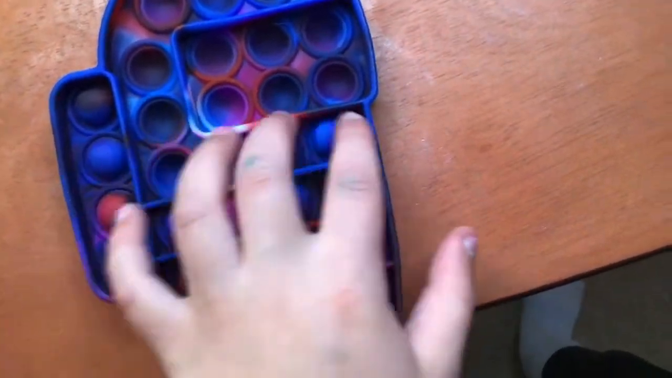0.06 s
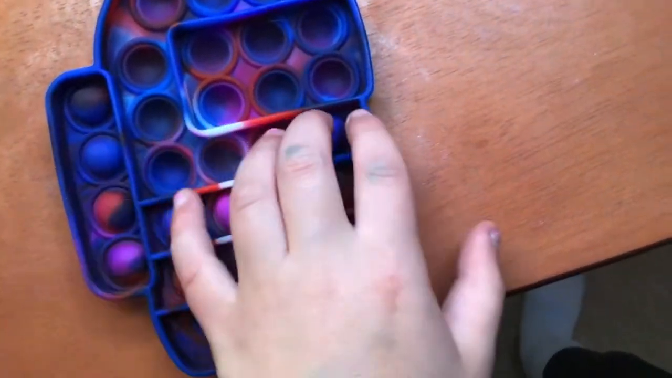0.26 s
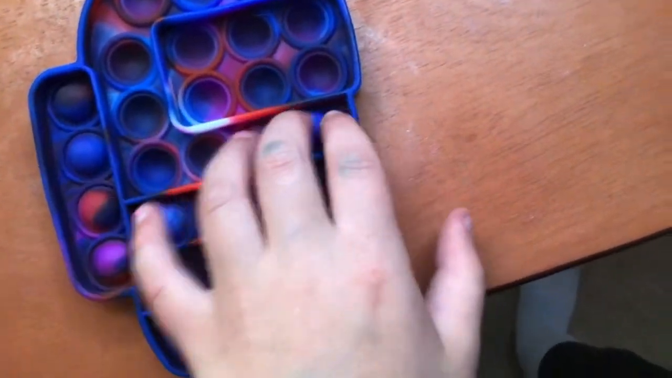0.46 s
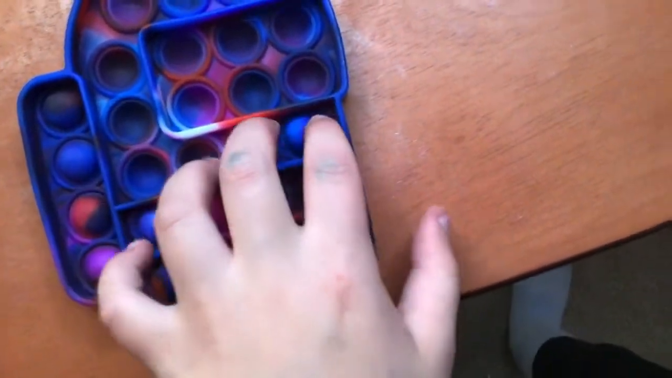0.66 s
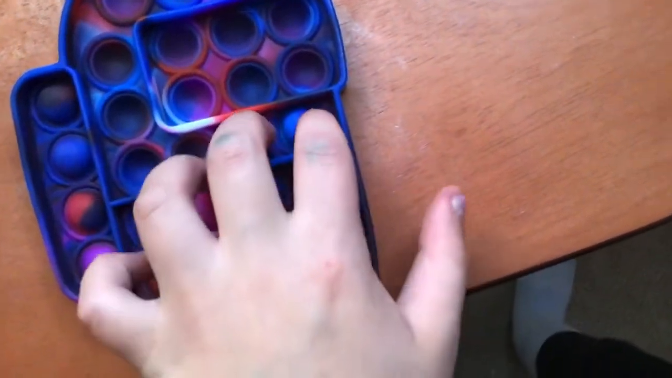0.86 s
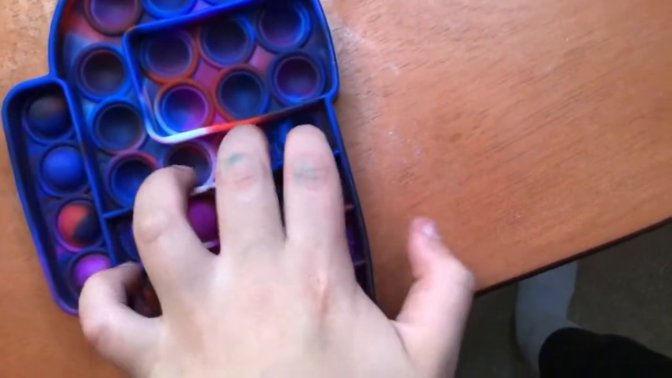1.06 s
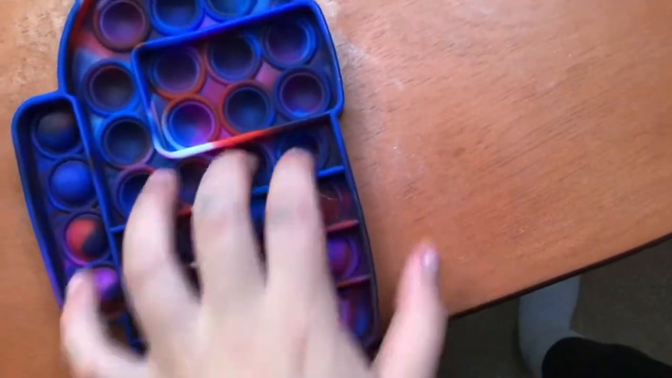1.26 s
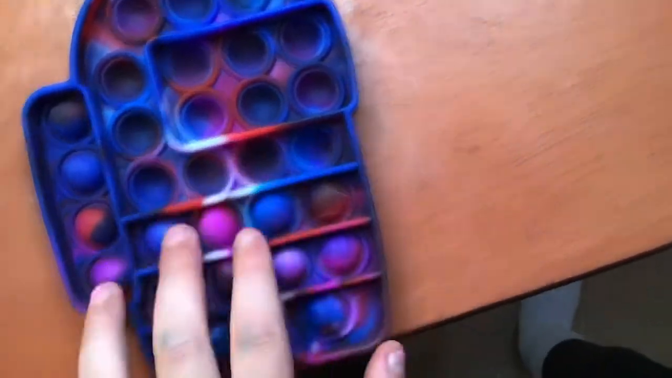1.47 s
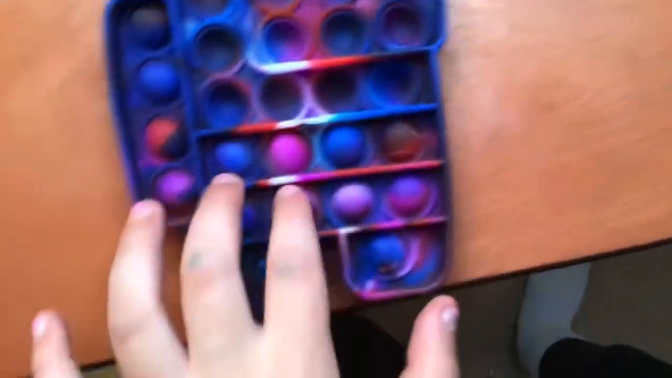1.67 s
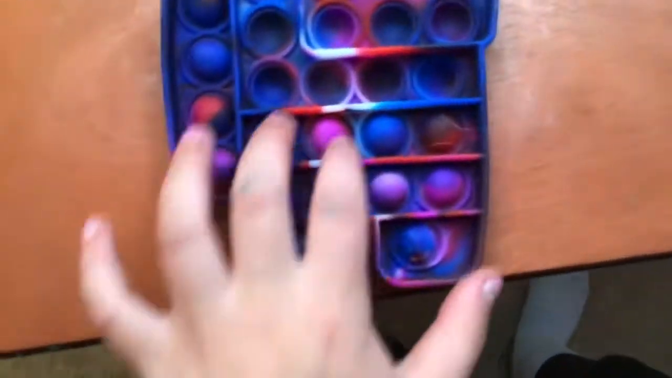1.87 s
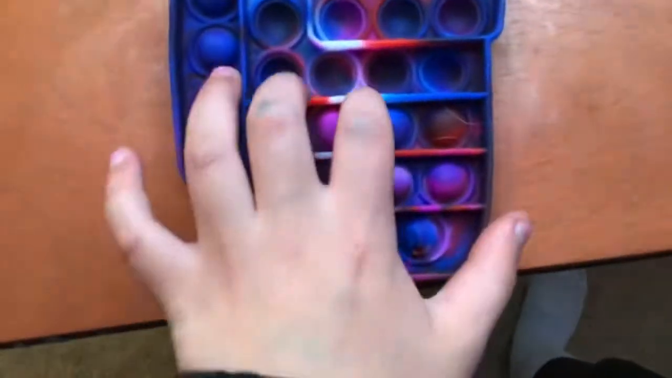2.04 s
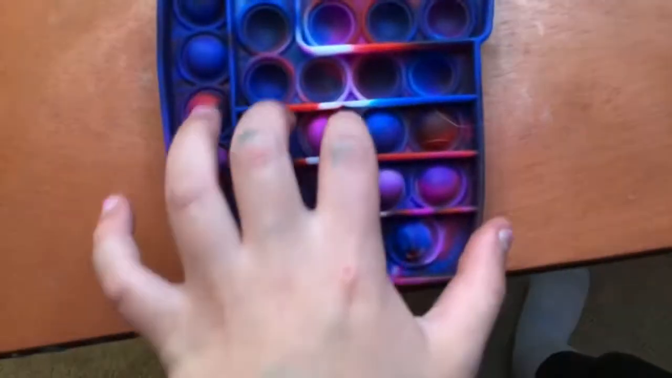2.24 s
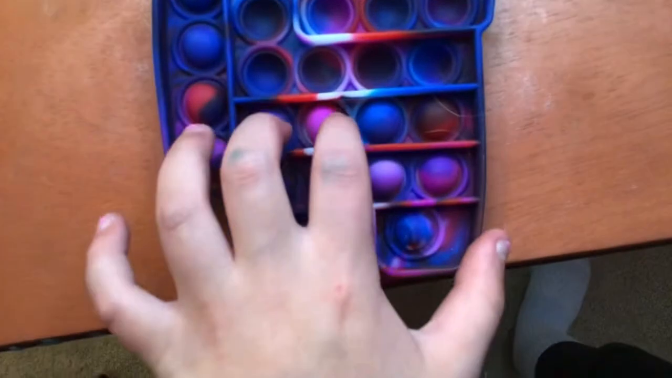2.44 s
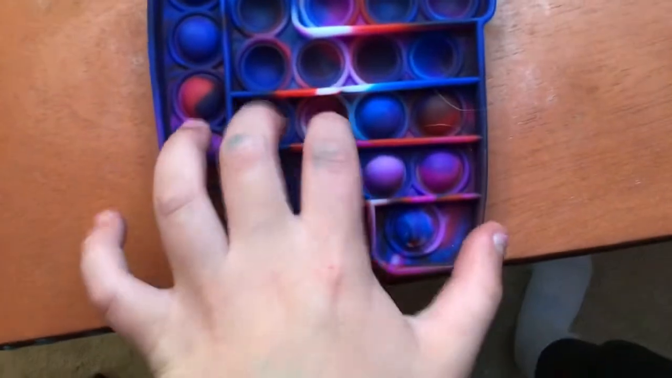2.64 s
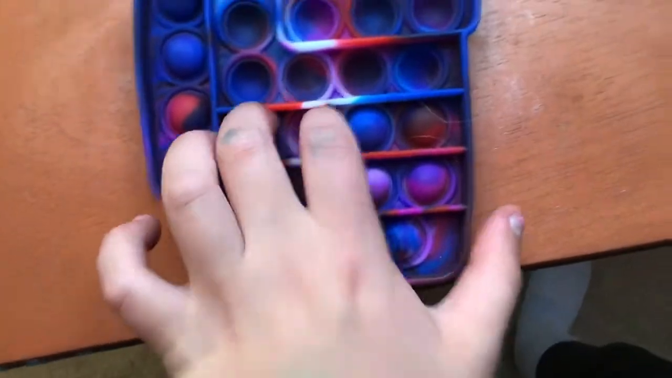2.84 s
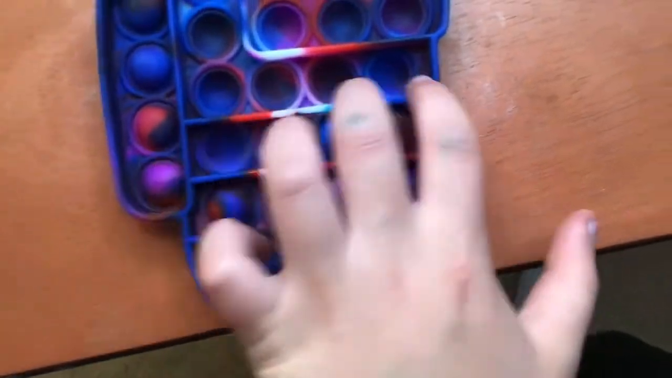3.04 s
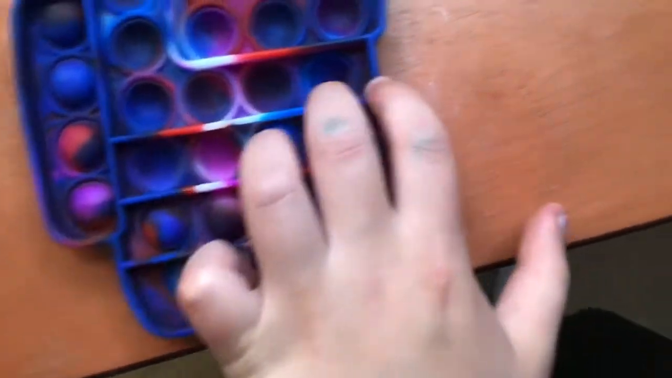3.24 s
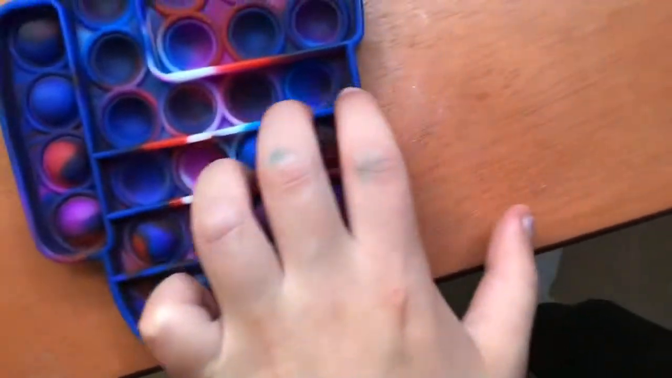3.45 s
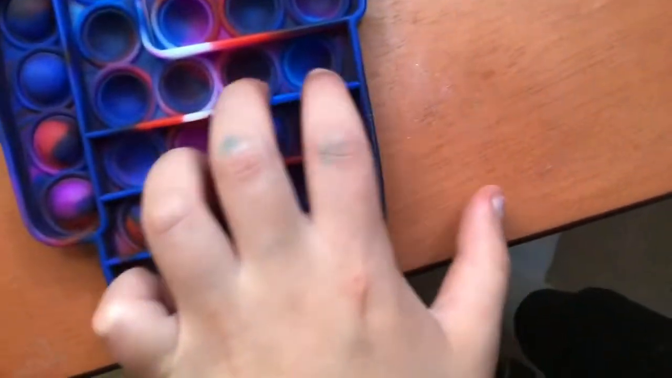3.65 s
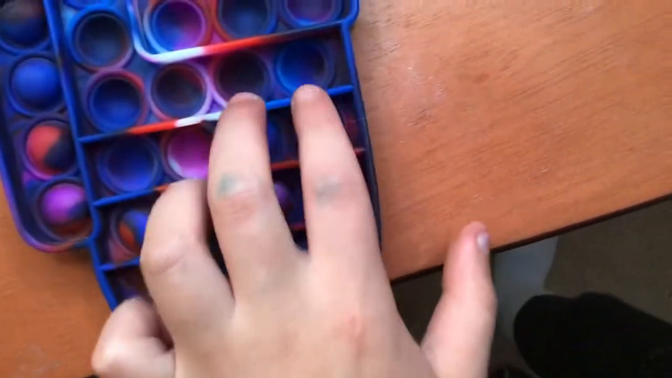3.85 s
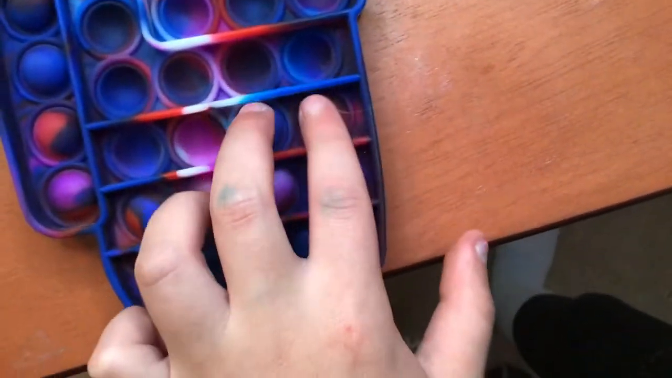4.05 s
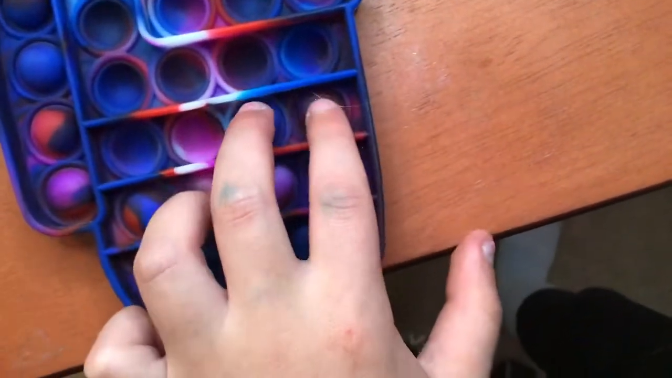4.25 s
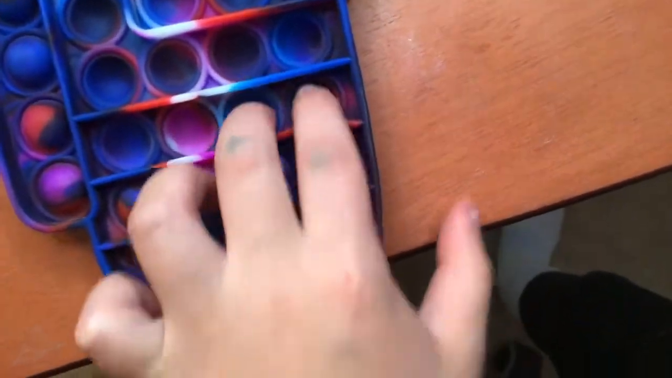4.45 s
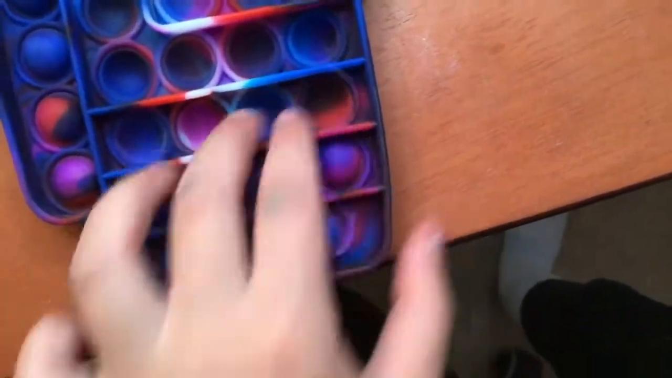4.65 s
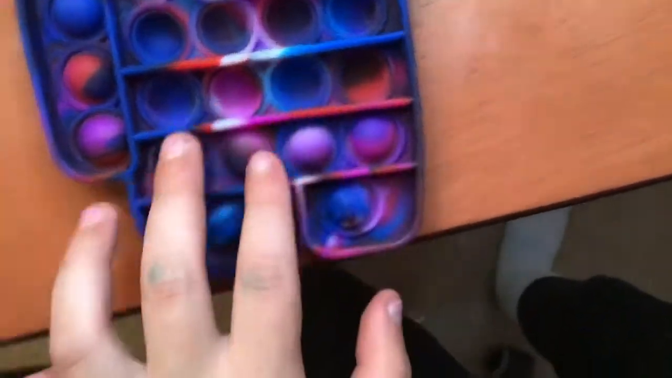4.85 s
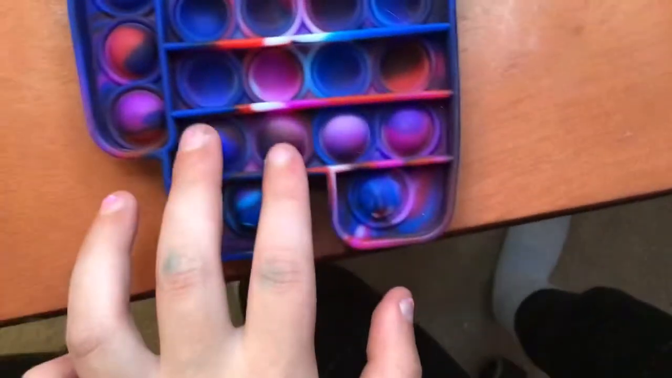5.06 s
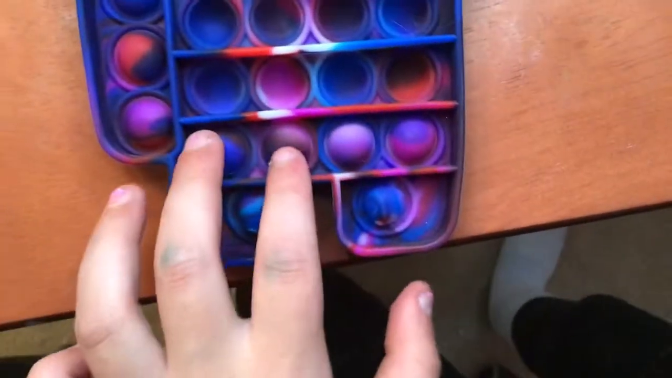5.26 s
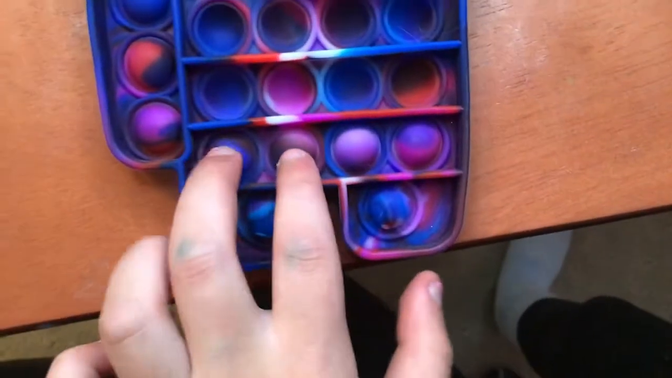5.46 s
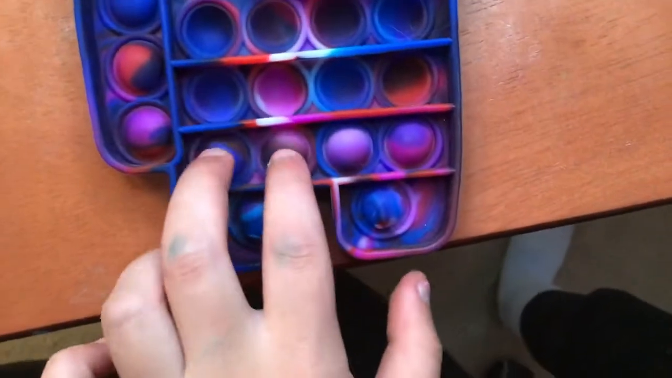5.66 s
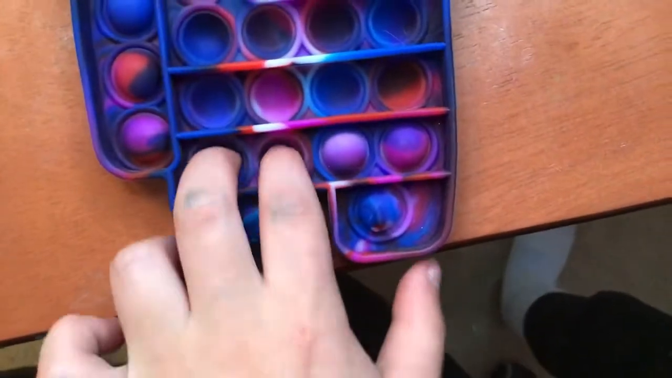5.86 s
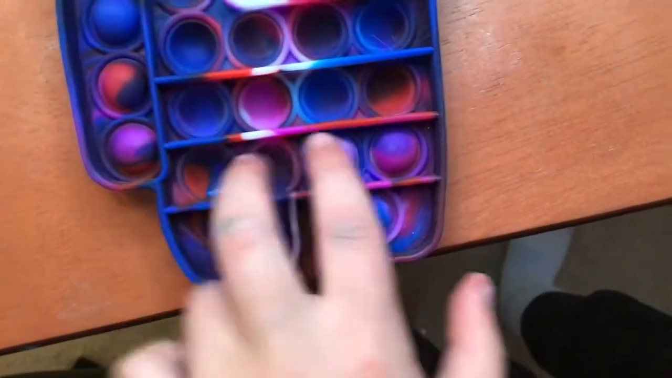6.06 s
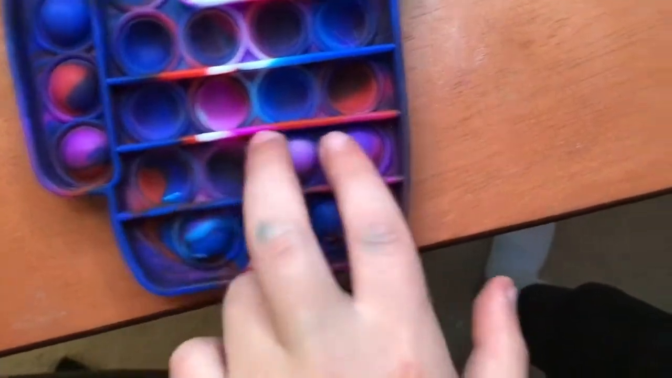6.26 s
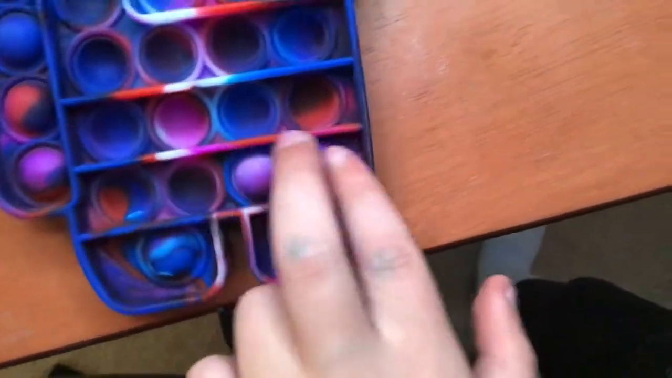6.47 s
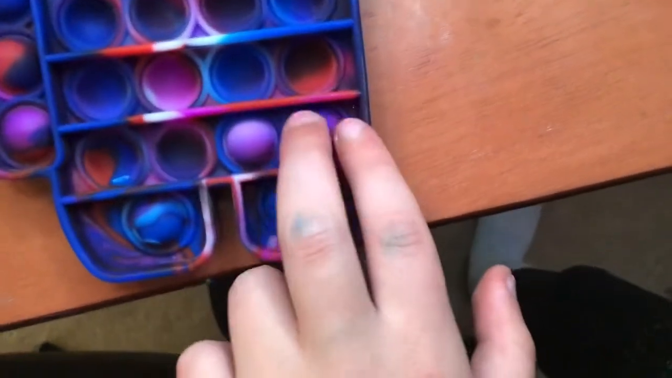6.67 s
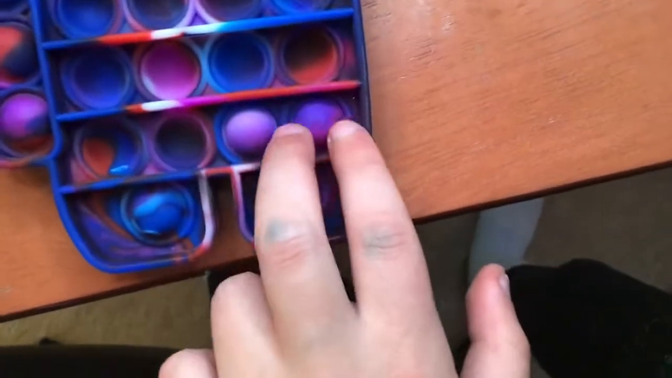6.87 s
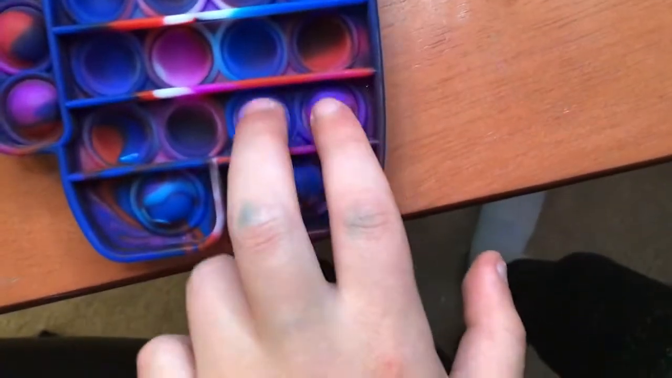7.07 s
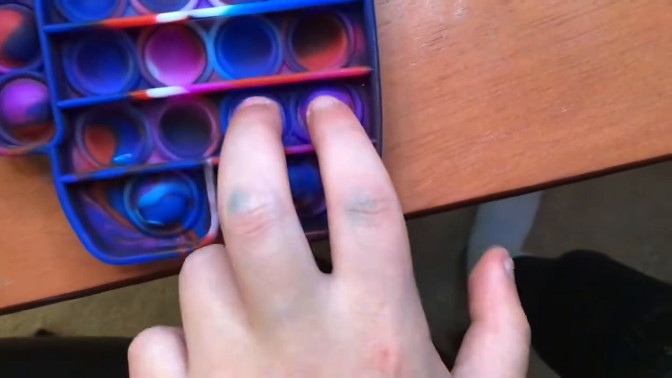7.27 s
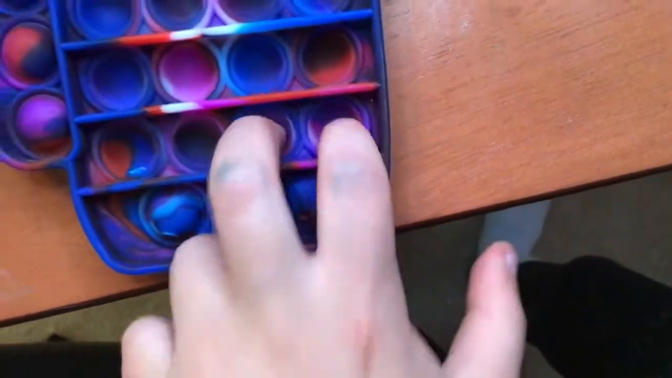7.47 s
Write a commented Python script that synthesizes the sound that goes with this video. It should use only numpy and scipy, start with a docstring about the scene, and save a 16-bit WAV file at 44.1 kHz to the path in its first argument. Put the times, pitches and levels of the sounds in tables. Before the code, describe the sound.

A close, single-channel sound of fingers playing with a silicone bubble toy on a wooden table in a small quiet room. Faint room noise and lumpy low rumble from the hand continue throughout. From 0.5 s, soft dry rubs and a dull pat lead to two pops at 1.1 and 1.16 s, the first louder, the second thinner and fizzier. Rubs and a strong low shift follow until about 1.8 s, then light fingertip pats. A tiny bright tick at 2.46 s precedes a nearly merged pair of pops at 2.73 s. Quiet pats and slides lead to another pair at 4.48 s, more rubbing, and a tight pair at 5.8 s. A soft table knock comes at 6.05 s, then small taps until a last, brightest and loudest pair at 7.43 s. Every pop is a short hollow snap with a falling chirp, brief wobble, short room echo and woody table resonance.

```python
"""Fingers play with a silicone bubble toy on a wooden table in a small quiet room, close to the microphone.
Room noise and low rumbles run throughout. Soft rubs (shaped noise) and pats (short rings) come first; two
domes pop near 1.1 s, each a falling chirp made by delaying bass more than treble, then a wobble.
A bright tick at 2.5 s precedes pairs of pops near 2.7, 4.5 and 5.8 s, a knock on the table near 6.05 s and
a last pair near 7.4 s, with more rubs and pats in between. Pops also make the table top ring on."""
import sys
import numpy as np
from scipy import signal
from scipy.fft import rfft, irfft
from scipy.io import wavfile
from scipy.ndimage import uniform_filter1d

SR = 44100
rng = np.random.default_rng(int(sys.argv[2]) if len(sys.argv) > 2 else 0)


def wrap_up_sound(samples):
    """Save the sound to the file named by the first command line argument, as 16-bit audio."""
    columns = np.atleast_2d(samples).T
    # keep every value between -1 and 1, then stretch to whole-number steps
    tamed = np.clip(columns, -1, 1)
    steps = np.round(tamed * 32767).astype(np.int16)
    wavfile.write(sys.argv[1], SR, steps)


N = 331191  # length in samples, about 7.5 s


def amp(db):
    """Turns a level in dB into a gain."""
    return 10 ** (np.asarray(db) / 20)


def evened(x):
    """Scales a signal to an rms (average strength) of 1."""
    return x / np.sqrt(np.mean(x ** 2) + 1e-20)


def smooth_noise(count, size):
    """Slowly wandering random values: noise averaged twice, rms 1."""
    once = uniform_filter1d(rng.standard_normal(count), size=size)
    return evened(uniform_filter1d(once, size=size))


def read(points, hz):
    """Reads a table of (pitch, value) between its points, on a log-frequency axis."""
    f, value = np.transpose(points)
    return np.interp(np.log(hz + 1), np.log(f + 1), value)


def add(mix, start_s, sound):
    """Adds a sound into the mix from a given time, cut off at the end of the mix."""
    part = mix[round(start_s * SR):][:len(sound)]
    part += sound[:len(part)]


def ring(t, hz, t60_s, rise_s):
    """One vibration with a soft start, falling by 60 dB in t60_s."""
    decay = amp(-60 * t / t60_s)
    soft_start = 1 - np.exp(-t / rise_s)
    return decay * soft_start * np.sin(2 * np.pi * hz * t)


def band(low_hz, high_hz):
    """Noise kept between two pitches with soft skirts, rms 1."""
    sos = signal.butter(2, [low_hz, high_hz], "bandpass", fs=SR, output="sos")
    return evened(signal.sosfilt(sos, rng.standard_normal(N)))


def air():
    """Steady room and microphone noise: white noise given a fixed colour."""
    # colour of the noise: pitch_hz, relative_level_db
    air_colour = [(18, -45), (30, -25), (70, -4.5), (138, -0.5), (275, -5), (339, -15.5), (387, -11.5),
                  (709, -10.5), (1030, -22.5), (1830, -19.5), (9900, -26), (14700, -31.5), (16300, -56)]
    level_db = -69.5  # overall rms level
    white = rfft(rng.standard_normal(N))
    gain = amp(read(air_colour, np.fft.rfftfreq(N, 1 / SR)))
    return amp(level_db) * evened(irfft(white * gain, N))


def rumble():
    """Hand and table moving: lumpy low noise in two bands, swelling where the hand leans or shifts."""
    # slow course of the rumble: time_s, deep_level_db (65-130 Hz), low_level_db (70-380 Hz)
    course = [(0.0, -63, -71.5), (0.94, -73, -73.5), (1.67, -63.5, -64), (1.84, -86, -68.5),
              (2.17, -76.5, -76), (2.94, -71, -66.5), (3.11, -72, -69.5), (4.66, -73, -66.5),
              (5.43, -72, -71), (5.68, -71, -68.5), (6.39, -72.5, -70), (7.5, -71.5, -70.5)]
    # swells as the hand leans: middle_s, half_length_s, deep_level_db, low_level_db (same bands)
    leans = [(0.146, 0.135, -66, -71), (0.34, 0.038, -67.5, -98), (0.73, 0.17, -69, -76),
             (0.916, 0.043, -62, -68.5), (1.404, 0.07, -67, -77), (1.502, 0.1, -71, -68),
             (1.735, 0.13, -59.5, -64.5), (2.496, .14, -70, -70.5), (2.966, 0.083, -72, -62.5),
             (3.698, 0.19, -68, -69.5), (4.464, 0.1, -65.5, -60.5), (4.896, .14, -66.5, -61.5),
             (5.486, 0.054, -66.5, -67.5), (5.664, 0.08, -59.5, -69.5), (6.695, 0.058, -64, -67),
             (6.816, 0.056, -67.5, -64.5), (7.23, 0.049, -62, -63)]
    lump_db, lump_s = 2, 0.086  # depth of the chance lumps (rms), length of their smoothing
    times, *columns = np.transpose(course)
    deep, low = (amp(np.interp(np.arange(N) / SR, times, column)) for column in columns)
    for middle_s, half_s, deep_db, low_db in leans:
        swell = np.hanning(round(2 * half_s * SR))
        add(deep, middle_s - half_s, amp(deep_db) * swell)
        add(low, middle_s - half_s, amp(low_db) * swell)
    lumps = amp(lump_db * smooth_noise(N, round(lump_s * SR)))
    return lumps * (deep * band(65, 130) + low * band(70, 380))


def rub():
    """Skin sliding on silicone: grainy friction noise that swells and fades, its bands wavering separately."""
    # short slides: start_s, length_s, dull_level_db, hiss_level_db (at its brightest), brightest_hz
    slides = [(0.508, .087, -66.5, -76.5, 3470), (0.65, .048, -71, -76, 5000),
              (.769, .081, -68.5, -84, 7000), (1.142, .042, -53, -61.5, 8000),
              (1.157, 0.13, -85, -66, 1790), (1.306, 0.072, -70, -69, 3000),
              (1.364, 0.14, -68, -74.5, 4500), (1.457, 0.086, -59, -67.5, 4870),
              (1.52, 0.13, -69, -76, 7000), (2.714, 0.06, -71.5, -64, 12000),
              (2.872, 0.044, -76, -75, 4930), (2.906, 0.069, -59, -61, 2500),
              (4.015, 0.074, -68.5, -74, 3000), (4.64, 0.084, -65.5, -67, 2900),
              (4.697, 0.077, -62, -67, 2750), (4.759, 0.17, -71, -70.5, 2980),
              (4.861, 0.18, -74.5, -75.5, 5000), (5.469, 0.075, -75, -76, 5420),
              (5.801, 0.11, -74, -74, 11800), (5.955, 0.12, -72.5, -69.5, 3480),
              (6.17, 0.064, -76, -77.5, 4030), (6.30, 0.051, -68, -72.5, 2770),
              (6.431, 0.097, -67.5, -69.5, 5520), (6.839, 0.091, -72, -76, 2000),
              (7.026, 0.087, -69, -76, 7020), (7.092, 0.07, -68.5, -76.5, 4000)]
    # the dull part, then four bands of hiss: low_hz, high_hz
    skin_bands = [(450, 950), (1500, 2100), (3200, 4900), (6200, 7900), (9000, 15000)]
    hiss_db_per_octave = 7.5  # the hiss falls away on both sides of its brightest pitch
    waver_db, grain_db = 3.3, 0.83  # rms depth of the chance level changes
    wavers = []
    for _ in skin_bands:
        slow = evened(uniform_filter1d(rng.standard_normal(N), size=250))
        wavers.append(amp(waver_db * slow))
    grain = amp(grain_db * evened(uniform_filter1d(rng.standard_normal(N), size=90)))
    parts = np.array(wavers) * np.array([band(*edges) for edges in skin_bands])
    centres = np.sqrt(np.prod(skin_bands[1:], axis=1))
    out = np.zeros(N)
    for start_s, length_s, dull_db, hiss_db, bright_hz in slides:
        piece = parts[:, round(start_s * SR):round((start_s + length_s) * SR)]
        octaves_away = abs(np.log2(centres / bright_hz))
        levels = amp(np.r_[dull_db, hiss_db - hiss_db_per_octave * octaves_away])
        swell = np.sin(np.linspace(0, np.pi, piece.shape[1]))
        add(out, start_s, levels @ piece * swell)
    return grain * out


def room(x):
    """Echoes of the room: sparse taps of random sign, each pitch range dying at its own speed."""
    # how long echoes last: pitch_hz, t60_s (time to fall by 60 dB)
    echo_times = [(150, 0.2), (400, .35), (900, 0.26), (2000, 0.23), (3300, 0.29), (5000, 0.3),
                  (7000, 0.19), (12000, 0.56)]
    # colour of the echoes: pitch_hz, relative_level_db
    echo_colour = [(100, -5.5), (400, -1.5), (1500, 0), (2400, -0.5), (4000, -2.5), (5200, -3),
                   (7000, -7.5), (12000, -10.5)]
    taps = np.zeros(SR // 2)
    at = np.arange(200, len(taps) - 20, 20)
    at = at + rng.integers(0, 20, len(at))  # one tap at a chance place in every 20 samples
    taps[at] = rng.choice([-1., 1.], len(at))
    hz, t, spectrum = signal.stft(taps, SR, nperseg=256)
    level_db = read(echo_colour, hz)[:, None] - 60 * t / read(echo_times, hz)[:, None]
    tail = signal.istft(spectrum * amp(level_db), SR, nperseg=256)[1]
    return signal.fftconvolve(x, tail / np.linalg.norm(tail))[:N]


def board(x):
    """The wooden table top rings on after each blow, at several pitches of its own."""
    # vibrations of the table top: pitch_hz, relative_level_db, t60_s
    board_modes = [(69.5, -16, 0.39), (154, -21, 0.62), (319.5, -30.5, 0.11), (387, -27.5, 0.094),
                   (524, -32, 0.15), (690, -29.5, 0.11), (922, -31.5, 0.17)]
    t = np.arange(SR // 2) / SR
    modes = sum(amp(db) * ring(t, hz, t60_s, 0.0086) for hz, db, t60_s in board_modes)
    return signal.fftconvolve(x, amp(-25.0) * modes)[:N]


def chink(db, buzz_db, buzz_t60_s):
    """A small bright tick: a few vibrations struck once, then shaken by dying noise so they buzz on."""
    # vibrations of the tick: pitch_hz, relative_level_db, t60_s
    tick_modes = [(3236, 1.5, 0.0134), (4160, 5, 0.012), (2100, -2.5, 0.0065), (6780, -10, 0.0054)]
    t = np.arange(6000) / SR
    drive = amp(buzz_db - 60 * t / buzz_t60_s) * rng.standard_normal(len(t)) / 10
    drive[0] = 1  # the strike
    modes = sum(amp(level) * ring(t, hz, t60_s, 0.00028) for hz, level, t60_s in tick_modes)
    return amp(db) * signal.fftconvolve(drive, modes)[:len(t)]


def touch(db, hz):
    """A fingertip or nail landing or leaving: a short damped ring, part tone, part noise around its pitch."""
    t60_at_1khz_s, shortens = 0.038, 0.47  # ring time falls as this power of the pitch
    pure_hz = 895  # lower touches are more tone, higher ones more wide noise
    t = np.arange(4000) / SR
    t60_s = t60_at_1khz_s * (hz / 1000) ** -shortens
    thin = hz ** 2 / (hz ** 2 + pure_hz ** 2)  # from 0 (low touch) towards 1 (high touch)
    tone = ring(t, hz, t60_s, .6 / hz)
    colour = ring(t, hz, (2.5 + 9 * (1 - thin)) / hz, 0.38 / hz)
    puff = signal.fftconvolve(rng.standard_normal(len(t)), colour)[:len(t)]
    sound = tone + (.35 + 1.3 * thin) * evened(puff) * amp(-60 * t / t60_s)
    return amp(db) * sound / abs(sound).max()


def pop(db, slowness, thump_db, cup_db, rim_db, fizz_db, crown_hz, crown_db):
    """A dome snaps through: one push smeared so treble mostly leads bass (a falling chirp), then a wobble."""
    # one flip, rim moving first and slow crown last: pitch_hz, relative_level_db, lag_ms (at slowness 1)
    flip_shape = [(60, -41, 12), (202, -17.5, 11), (376, -7.5, 7.), (554, -6.5, 4.1), (925, 1.5, 4.5),
                  (1360, -7, 4.9), (1680, -0.5, 3.4), (2460, -13.5, 3.1), (3250, -11.5, 3.3),
                  (4010, -19, 2.5), (5030, -32.5, 4.5), (6140, -32, 3.7), (8330, -48.5, 3.8),
                  (16000, -57.5, 3.2)]
    # centres of thump, body, cup, rim, crack and fizz: pitch_hz
    part_centres = [330, 800, 1680, 3250, 6500, 12000]
    # the upturned dome wobbles on: pitch_hz (before a chance detune), relative_level_db, t60_s
    cup_modes = [(650, -39.5, 0.057), (850, -39, .025), (1750, -36, 0.015), (3340, -36, 0.014),
                 (5600, -45, 0.011)]
    fade_in_s = .0024  # the pop fades in over this time
    notch_db = 4.5  # chance peaks and dips (rms), full size from 5 kHz up
    crack_share = .5  # the crack follows the fizz by this share, in dB
    crown_cycles = 12  # the crown dies by 60 dB in this many cycles
    hz, t = np.fft.rfftfreq(4096, 1 / SR), np.arange(4096) / SR
    f, level_db, lag_ms = np.transpose(flip_shape)

    parts_db = [thump_db, 0, cup_db, rim_db, crack_share * fizz_db, fizz_db]
    colour_db = read(np.c_[f, level_db], hz) + read(np.c_[part_centres, parts_db], hz)
    colour_db += notch_db * np.clip(hz / 5000, 0, 1) * smooth_noise(len(hz), 36)

    stretched_ms = lag_ms[-1] + slowness * (lag_ms - lag_ms[-1])
    lag_s = read(np.c_[f, stretched_ms], hz) / 1000
    # the crack is noisy, the chirp below it clean
    ragged = np.clip(hz / 7000, 0, 1) ** 3 * 1.1 * smooth_noise(len(hz), 40)
    # summing the lags over pitch gives the phase that delays each pitch
    phase = -2 * np.pi * np.cumsum(lag_s) * hz[1] + ragged + np.pi / 5
    flip = irfft(amp(colour_db) * np.exp(1j * phase))

    wobble = np.zeros(len(t))
    for mode_hz, mode_db, t60_s in cup_modes:
        detune = 1 + 0.067 * rng.standard_normal()
        wobble += amp(mode_db) * ring(t, mode_hz * detune, t60_s, 0.00064)
    # each dome has a crown pitch of its own
    wobble += amp(crown_db) * ring(t, crown_hz, crown_cycles / crown_hz, 0.00055)
    sound = flip + signal.fftconvolve(flip, wobble)[:len(t)]
    sound *= np.minimum(t / fade_in_s, 1) ** 2
    return amp(db) * sound[:3000] / abs(sound).max()


def scene():
    """Pops, a table knock and touches set the room ringing; pops and knock also ring the table."""
    # domes snapping through, and one table knock at 6.05 s made the same way: start_s, peak_db,
    # slowness (factor), thump_db, cup_db, rim_db, fizz_db, crown_hz, crown_db,
    # knock_db (into the table, relative to the direct sound)
    presses_and_knock = [(1.0972, -8.5, .85, -.6, -0.9, -1.5, -1.5, 1040, -32.5, -6.5),
                         (1.1628, -15, 1.05, 0.7, -3.7, -5, 18, 620, -30, -4),
                         (2.729, -11.5, 1.13, 0, -6.5, -1.5, 0, 756, -30.5, 2),
                         (2.7448, -10, 1.1, 1.7, -2.5, 4, -4.5, 554.6, -34.5, -5.5),
                         (4.4762, -10, 1.1, 2.1, -4, 0.8, 3, 505, -34, 2),
                         (4.4948, -10, .85, -3.5, -1, 2, 4, 1133, -22, -1.5),
                         (5.8005, -9, 1.01, 5.5, 2.5, 0, 9, 840, -35.5, -3.5),
                         (5.8044, -10, .977, 1, 1.5, 6.5, 3, 900, -37, -1),
                         (6.0496, -28, .93, 5.5, -3, -9.5, 7, 725, -27, 10.5),
                         (7.4258, -7, .883, 4, 7, 14.5, 8.5, 1656, -24, -10),
                         (7.431, -8.5, 1.08, -7, -2.5, -1, 9, 400, -32, 0.5)]
    # fingertips and nails landing or leaving: start_s, peak_db, pitch_hz
    taps = [(.523, -52.5, 180), (1.294, -50.5, 690), (1.530, -53, 1090), (1.531, -52, 160),
            (1.619, -52.5, 2200), (1.813, -60, 1274), (1.821, -47.5, 252), (2.078, -58, 740),
            (2.152, -54.5, 600), (2.256, -46, 627), (2.4276, -54, 4450), (2.973, -47.5, 810),
            (3.093, -52, 250.6), (3.853, -55, 774), (3.855, -47.5, 152), (4.047, -44.5, 660),
            (4.047, -56.5, 2470), (4.155, -49, 256), (4.387, -53, 174), (4.843, -60, 1670),
            (4.861, -46.5, 207), (5.237, -55, 5000), (5.238, -56, 634), (5.594, -47, 170),
            (5.654, -60.5, 2220), (6.164, -52, 778), (6.215, -51.5, 250), (6.315, -49, 241),
            (6.542, -47.5, 229), (6.797, -49, 193), (7.199, -52, 182)]
    # small bright tick: start_s, level_db, buzz_db (before a cut to a tenth), buzz_t60_s
    ticks = [(2.4640, -44, -11.5, 0.15)]
    direct, into_table, touches = np.zeros((3, N))
    for start_s, *row, knock_db in presses_and_knock:
        sound = pop(*row)
        add(direct, start_s, sound)
        add(into_table, start_s, amp(knock_db) * sound)
    for start_s, *row in taps:
        add(touches, start_s, touch(*row))
    for start_s, *row in ticks:
        add(touches, start_s, chink(*row))
    near = direct + touches
    echoes = amp(-19) * room(near)
    mix = near + board(into_table) + echoes + rub() + rumble() + air()
    return mix[None]  # one channel


def record(dry):
    """The microphone rolls off the bass, then a steep filter removes the highest treble."""
    bass_cut_hz, edge_hz = 55, 15650
    thin = signal.sosfilt(signal.butter(2, bass_cut_hz, "highpass", fs=SR, output="sos"), dry)
    treble_cut = signal.firwin(255, edge_hz, window=("kaiser", 9), fs=SR)
    return signal.oaconvolve(thin, treble_cut[None], "same")


dry = scene()
out = record(dry)
wrap_up_sound(out)
```